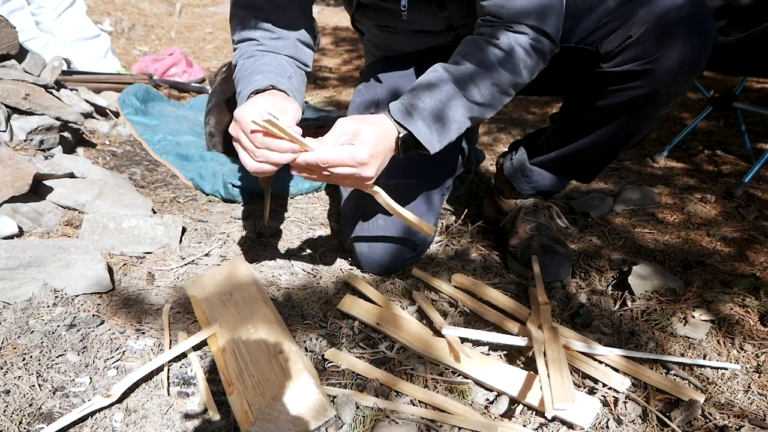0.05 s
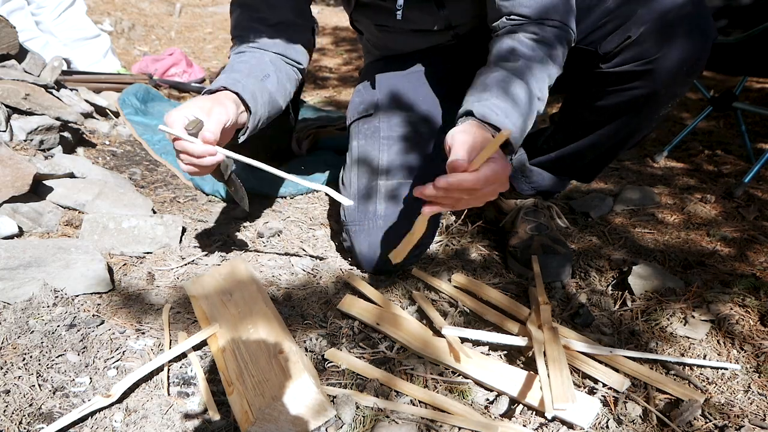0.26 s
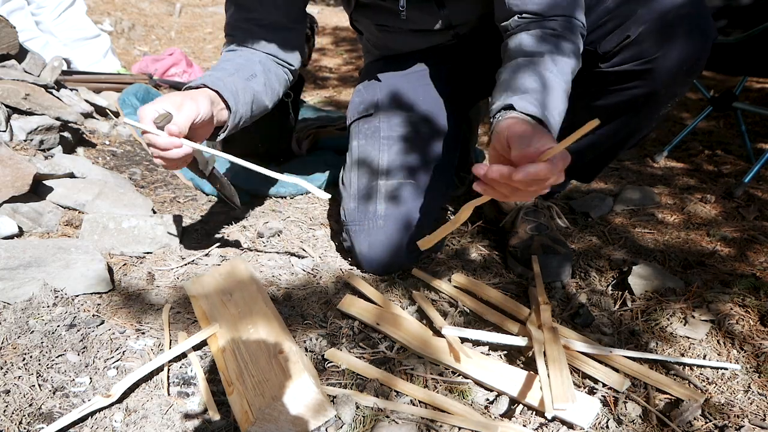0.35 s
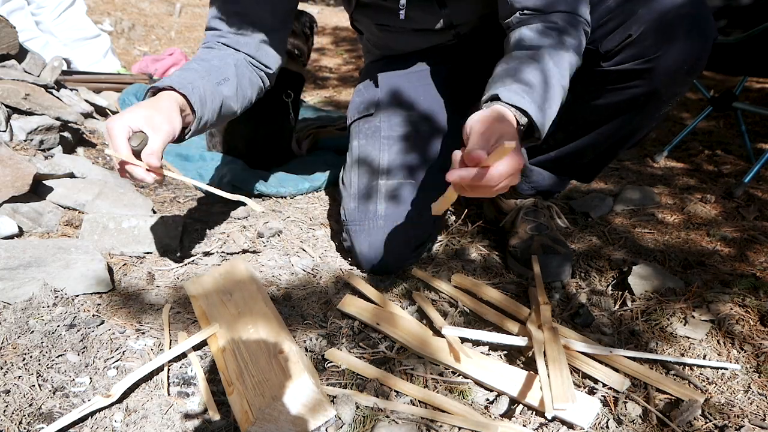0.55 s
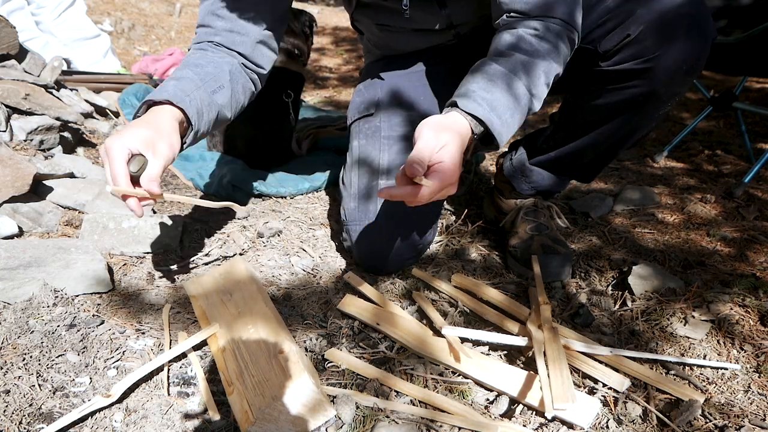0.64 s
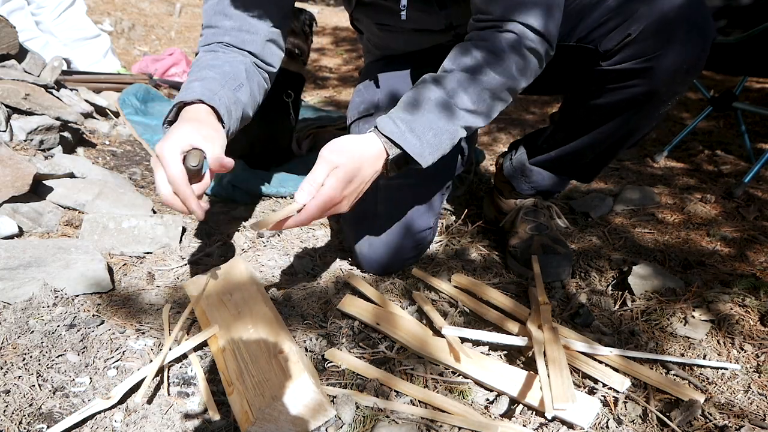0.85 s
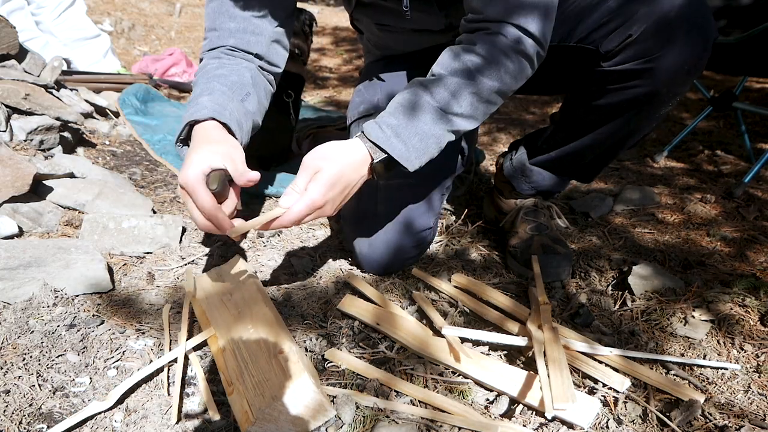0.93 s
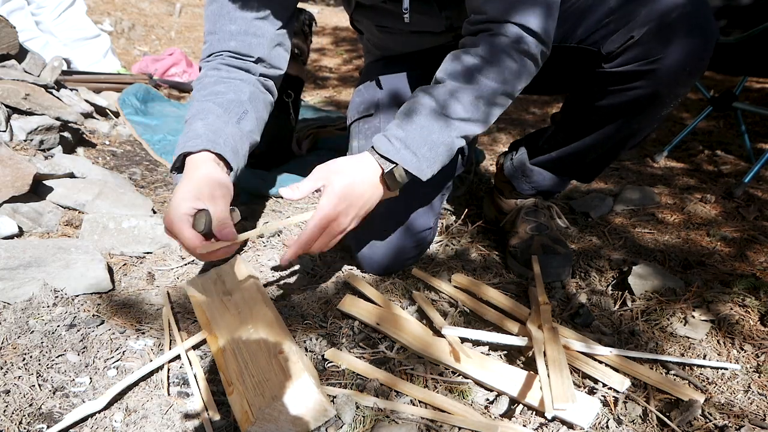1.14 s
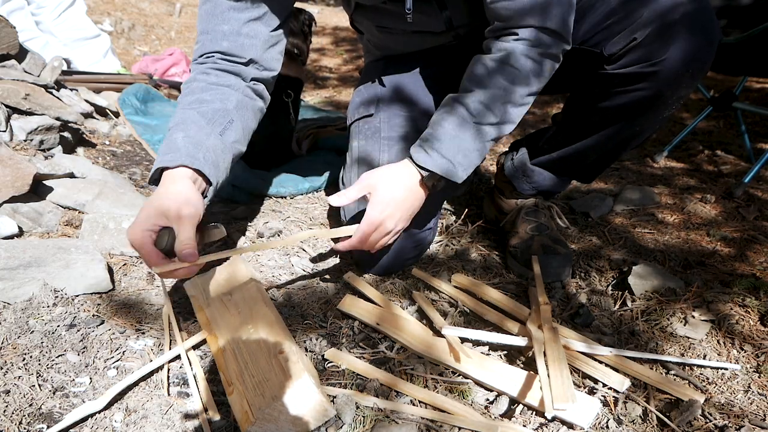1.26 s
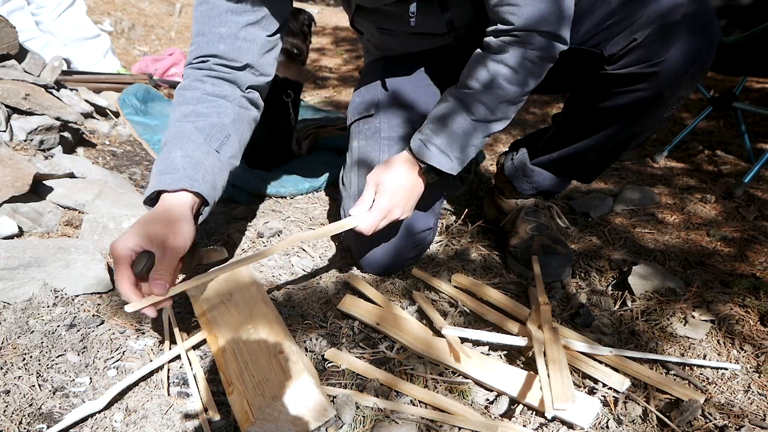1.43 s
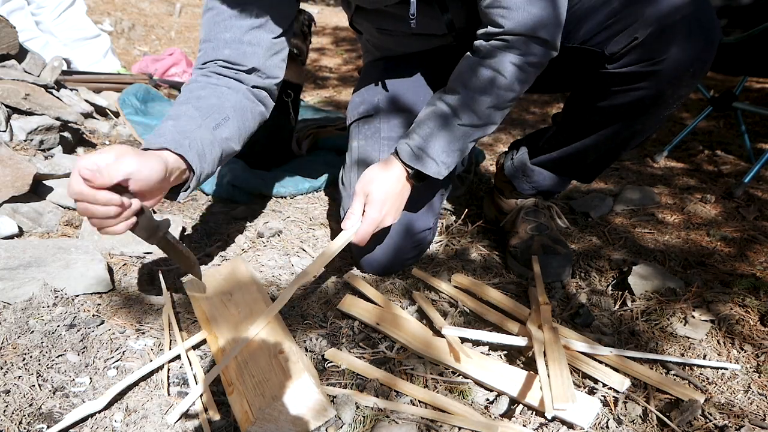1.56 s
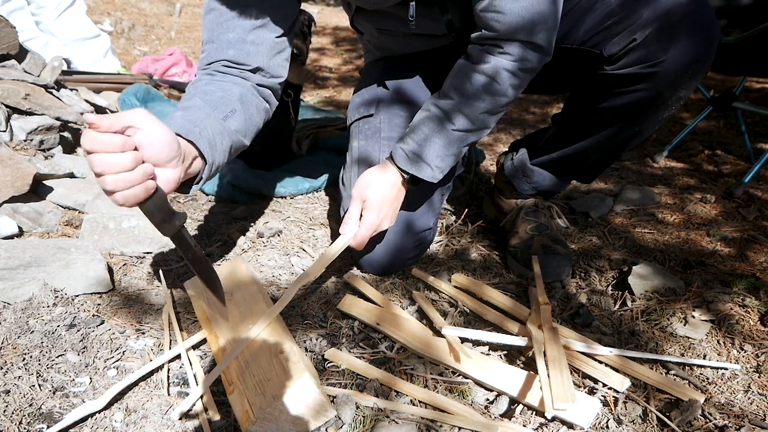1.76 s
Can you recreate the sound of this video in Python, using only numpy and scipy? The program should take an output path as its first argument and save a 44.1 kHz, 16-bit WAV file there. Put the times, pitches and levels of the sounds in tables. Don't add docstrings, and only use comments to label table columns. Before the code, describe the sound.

Wood cracking up close outdoors: fingers rub softly, brittle fibres rip and snap almost at once, light bumps follow, then a dropped stick clacks on other wood and bounces, with faint taps, cloth rustle and low wind.

```python
import sys
import numpy as np
from scipy import signal
from scipy.io import wavfile
from scipy.ndimage import uniform_filter1d

SR = 44100
rng = np.random.default_rng(int(sys.argv[2]) if len(sys.argv) > 2 else 0)


def gain_from_decibels(decibels):
    exponent = np.asarray(decibels, float) / 20
    return 10 ** exponent


def waveform_to_disk(signal):
    frames = np.transpose(np.atleast_2d(signal))
    scaled = np.clip(frames, -1, 1) * 32767
    samples = np.round(scaled).astype(np.int16)
    wavfile.write(sys.argv[1], SR, samples)


N = 79380

# (frequency [Hz], level [dB])
STRIP = [(1100, -22), (2300, -12), (3600, -19), (5500, -1), (8500, -2), (10300, -13), (12800, -6),
         (15700, -17)]


def evened(x):
    return x / np.sqrt(np.mean(x ** 2) + 1e-20)


def peaked(x):
    return x / abs(x).max()


def read(points, hz):
    f, value = np.transpose(points)
    return np.interp(np.log(hz + 1), np.log(f + 1), value)


def level(points):
    return gain_from_decibels(np.interp(np.arange(N) / SR, *np.transpose(points)))


def add(mix, s, sound):
    part = mix[round(s * SR):][:len(sound)]
    part += sound[:len(part)]


def resonate(x, hz, width):
    return signal.lfilter(*signal.iirpeak(min(hz, SR * .45), max(hz / width, .3), SR), x)


def coloured(x, points):
    hz = abs(np.fft.fftfreq(4096, 1 / SR))
    octaves_below = np.maximum(np.log2(points[0][0] / (hz + 1)), 0)
    log_gain = np.log(gain_from_decibels(read(points, hz) - 41 * octaves_below) + 1e-5)
    impulse = np.fft.ifft(np.exp(np.conj(signal.hilbert(log_gain)))).real[:2048]
    return signal.oaconvolve(x, impulse)[:len(x)]


def wash(points, size, patchy_db):
    hz = np.fft.rfftfreq(size, 1 / SR)
    a, b, patches = rng.standard_normal((N * 4 // size + 5, len(hz), 3)).T
    patches = uniform_filter1d(patches, size=12, axis=0)
    patches = evened(uniform_filter1d(patches, size=10, axis=1))
    octaves_above = np.maximum(np.log2((hz + 1) / points[-1][0]), 0)
    octaves_below = np.maximum(np.log2(points[0][0] / (hz + 1)), 0)
    spectrum_db = read(points, hz) - 60 * octaves_above - 12 * octaves_below
    z = (a + 1j * b) * gain_from_decibels(spectrum_db[:, None] + patchy_db * patches)
    return evened(signal.istft(z, nperseg=size, noverlap=size * 3 // 4)[1][:N])


def scattered_grains(chance, spread_db, limit):
    strength = gain_from_decibels(spread_db * np.minimum(rng.exponential(1, N), limit))
    return strength * (rng.random(N) < chance) * rng.choice([-1, 1], N)


def burst(noise, hz, t60, width, snap_t60, fizz_db, share):
    t = np.arange(len(noise)) / SR
    decay = gain_from_decibels(-60 * t / snap_t60) + gain_from_decibels(fizz_db - 60 * t / t60)
    drive = (t == 0) + share * noise * decay
    pitched = resonate(drive, hz, width * hz)
    return drive, resonate(pitched, hz, 2 * width * hz)


def distant_wash():
    # (frequency [Hz], level [dB])
    air = [(150, -3), (260, -6), (600, -1.5), (1300, -3), (2900, -22.5), (8500, -35), (10500, -32),
           (14000, -34)]
    return gain_from_decibels(-49.5) * wash(air, size=1024, patchy_db=0.5)


def wind():
    # (frequency [Hz], level [dB])
    rumble = [(8.8, -24), (15, 10.5), (35, -14.5), (74, -14), (145, -28), (300, -37.5), (390, -55),
              (660, -120)]
    # (time [s], level [dB])
    gust = [
        (0.0, -39),
        (1.748, -43.5),
        (1.8, -57),
    ]
    return level(gust) * wash(rumble, size=4096, patchy_db=4.0)


def sleeve():
    # (time [s], level [dB])
    motion = [(0, -56), (.03, -62), (.06, -62), (.26, -49.5), (.34, -50.5), (.41, -49), (.5, -49),
              (.6, -44), (.69, -49.5), (.73, -53.5), (.86, -50.5), (1.05, -52), (1.25, -54), (1.34, -45.5),
              (1.42, -49.5), (1.6, -51), (1.72, -52.5), (1.8, -63)]
    # (frequency [Hz], level [dB])
    weave = [(600, 4), (1500, 4.5), (3000, -3), (6400, -5.5), (8500, -4.5), (10500, -13.5), (13500, -12.5),
             (15700, -17)]
    rustles_per_s, hiss_share = 2500, 0.65
    grains = scattered_grains(rustles_per_s / SR, spread_db=3, limit=4)
    hiss = wash(weave, size=256, patchy_db=-2.0)
    cloth = hiss_share * hiss + (1 - hiss_share) * evened(coloured(grains, weave))
    return level(motion) * evened(cloth)


def slide():
    # (time [s], level [dB])
    rubbing = [
        (0, -50),
        (.1, -48),
        (.17, -49),
        (.3, -53),
        (.45, -57),
        (.55, -85),
    ]
    # (frequency [Hz], width [Hz], level [dB])
    grip = [(950, 220, -10), (1610, 180, 13), (2132, 170, 14), (2510, 260, 5)]
    roughness = evened(uniform_filter1d(rng.standard_normal(N), size=500))
    rub = rng.standard_normal(N) * gain_from_decibels(1.6 * roughness)
    body = np.zeros(N)
    for hz, width, db in grip:
        body += gain_from_decibels(db) * resonate(resonate(rub, hz, width), hz, 2 * width)
    return level(rubbing) * evened(body)


def tear():
    # (time [s], level [dB])
    ripping = [(.175, -90), (.178, -46), (.202, -46), (.2055, -30), (.243, -31), (.262, -50), (.28, -90)]
    grains = scattered_grains(.12, spread_db=4, limit=3)
    return level(ripping) * evened(coloured(grains, STRIP))


def cracks():
    # (time [s], peak level [dB], centre [Hz], t60 [s])
    snaps = [(.1772, -20, 7000, .022), (.1812, -31, 8000, .012), (.1937, -25, 8000, .02),
             (.2006, -31, 5500, .01), (.2025, -27, 8000, .04), (.2054, 0, 7500, .011),
             (.2059, -7, 5700, .014), (.2070, -10, 8000, .03), (.2114, -8, 7500, .016),
             (.2149, -3, 6500, .009), (.2175, -7, 7800, .014), (.2186, -12, 5300, .035),
             (.2222, -23, 6000, .03), (.2257, -14, 5000, .016), (.2268, -15, 7000, .018),
             (.2309, -12, 5800, .025), (.2322, -15, 5500, .02), (.2346, -15, 6000, .02),
             (.2357, -6, 5200, .014), (.2360, -7, 5000, .012), (.2374, -3, 5500, .01),
             (.2378, -8, 5500, .012), (.2382, -8, 5600, .014), (.2385, -12, 12500, .025),
             (.2403, -14, 6500, .015), (.2412, -10, 5500, .02), (.2456, -18, 5500, .025),
             (.2509, -21, 7000, .018), (.2568, -28, 6000, .014), (.2646, -30, 6000, .008),
             (.2678, -28, 6000, .008), (.3055, -38, 13000, .02), (.3345, -34, 12500, .035),
             (.3365, -33, 13000, .03), (.3395, -38, 12000, .02)]
    snap_noise, plain_t60 = .13, .014
    wide_db = -1
    out, noise = np.zeros(N), rng.standard_normal((len(snaps), 2000))
    for (s, db, hz, t60), row in zip(snaps, noise):
        fray = snap_noise * (t60 / plain_t60) ** 2
        drive, snap = burst(row, hz, t60, width=.36, snap_t60=.003, fizz_db=-4, share=fray)
        sound = peaked(snap) + gain_from_decibels(wide_db) * peaked(coloured(drive, STRIP))
        add(out, s, gain_from_decibels(db) * peaked(sound))
    return out


def knocks():
    # (time [s], peak level [dB], centre [Hz], t60 [s])
    bumps = [(.2374, -13, 1900, 0.01), (.3060, -36, 750, .02), (.3085, -45, 760, 0.017),
             (0.3272, -30, 1160, 0.015), (0.3395, -32, 2300, 0.012), (0.3665, -25, 1300, 0.0035),
             (0.3667, -27, 2100, 0.008), (.3683, -26, 1600, 0.026), (0.3742, -32, 1400, 0.021),
             (.4220, -38, 600, 0.018), (.9637, -33, 1550, 0.009), (0.9945, -28, 1500, 0.0073),
             (1.0458, -30, 900, .012), (1.0885, -29, 1420, .015), (1.3790, -38.5, 726, .02),
             (1.392, -35, 590, 0.039), (1.4541, -26, 4150, 0.0065), (1.4541, -33.5, 1270, 0.013),
             (1.4746, -36, 1150, 0.02), (1.6838, -34, 1000, 0.02), (1.7112, -35, 1500, 0.0098),
             (1.7228, -35, 950, 0.03), (.2114, -30, 950, .015), (.2152, -34, 950, .012),
             (.2318, -23, 1700, .035), (.2405, -21, 1800, .02), (.2462, -28, 2200, .015),
             (.3290, -33, 1100, .012), (.9755, -35, 1600, .012), (1.6845, -37, 450, .03)]
    out, noise = np.zeros(N), rng.standard_normal((len(bumps), 2500))
    for (s, db, hz, t60), row in zip(bumps, noise):
        bump = burst(row, hz, t60, width=.8, snap_t60=.0089, fizz_db=0, share=.06)[1]
        bump = signal.sosfilt(signal.butter(4, 1.6 * hz, fs=SR, output="sos"), bump)
        add(out, s, gain_from_decibels(db) * peaked(bump))
    return out


def taps():
    # (time [s], peak level [dB], brightness [dB per octave], tick [dB], pile [dB])
    contacts = [(.8700, -30, 0, -7, -25), (.9120, -30, 4, 4, -10), (.9141, -18, -5, 2, 0),
                (.9148, -5, 0, -4, 0), (.9164, -11, 5, 0, 2), (.9231, -21, -14, -10, -8),
                (.9295, -26, -3, 3, 3), (.9503, -22, 8, -4, -16), (.9635, -37, -24, -16, -12),
                (.9755, -38, -24, -16, -12), (.9942, -33, -24, -9, -6), (1.0400, -41, 3, 6, -9),
                (1.0520, -42, 2, 4, -9), (1.0890, -41, 0, 6, -9), (1.160, -41, 2, 3, -9),
                (1.1836, -43, 6, 8, -9), (1.530, -44, 6, 8, -9), (1.6836, -29, -30, -8, -25),
                (1.7220, -38, -22, -6, -25), (1.7393, -39, -22, -14, -25), (1.7505, -38, -22, -14, -25)]
    # (frequency [Hz], level [dB], t60 [s])
    stick = [(1930, -6, .042), (2940, -20, .075), (3400, -20, .06), (3790, -19, .07), (4830, -21, .06),
             (5360, -12, .045), (7170, -16, .04), (8900, -17, .03), (11900, -24, .024), (13100, -30, .03)]
    # (frequency [Hz], level [dB], t60 [s])
    pile = [(1105, -19, .07), (1250, -24, .025), (1650, -10, .022), (2300, -11, .03), (2650, -12, .025),
            (3200, -15, .025), (4590, -10, .03), (5450, -16, .018), (5750, -14, .015), (6890, -2, .014),
            (7750, -12, .014), (8200, -15, .014), (13600, -15, .012)]
    # (frequency [Hz], level [dB])
    tick_colour = [(1200, -5), (2600, 0), (4100, -9), (7800, -3), (10300, -15), (13500, -12), (15700, -20)]
    spread_db, tick_t60, contact_s = 1.5, .022, .0002
    out, t = np.zeros(N), np.arange(6000) / SR
    hz, mode_db, t60 = np.concatenate([stick, pile]).T[:, :, None]
    in_pile = (np.arange(len(hz)) >= len(stick))[:, None]
    octaves = abs(np.log2(hz / 1900))
    chance = rng.standard_normal((len(contacts), len(hz), 2))
    noise = rng.standard_normal((len(contacts), len(t)))
    for (s, db, tilt_db, tick_db, pile_db), c, row in zip(contacts, chance, noise):
        blow_db = mode_db + pile_db * in_pile + tilt_db * octaves + spread_db * c[:, :1]
        detuned = hz * (1 + 0.003 * c[:, 1:])
        modes = gain_from_decibels(blow_db - 60 * t / t60) * np.sin(2 * np.pi * detuned * t)
        ring = modes.sum(0) * (1 - np.exp(-t / contact_s))
        tick_tilt = .3 * max(tilt_db, -3)
        tilted = [(f, d + tick_tilt * np.log2(f / 3000)) for f, d in tick_colour]
        tick = coloured(row * gain_from_decibels(-60 * t / tick_t60), tilted)
        sound = peaked(ring) + gain_from_decibels(tick_db) * peaked(tick)
        add(out, s, gain_from_decibels(db) * peaked(sound))
    return out


def ground(x):
    t = np.arange(4000) / SR
    echo_t60, first_s = .03, .0012
    reflections = rng.choice([-1., 1.], len(t)) * (rng.random(len(t)) < .1)
    tail = reflections * gain_from_decibels(-60 * t / echo_t60) * (t > first_s)
    return signal.oaconvolve(x, tail / np.linalg.norm(tail))[:N]


def scene():
    floor = distant_wash() + wind()
    handling = sleeve() + slide()
    hits = tear() + cracks() + knocks() + taps()
    echo_db = -17
    return (hits + gain_from_decibels(echo_db) * ground(hits) + handling + floor)[None]


def top_cut(x):
    return signal.sosfilt(signal.butter(12, 16440, fs=SR, output="sos"), x)


def record(dry):
    edge_hz, leak_db = 15800, -45
    dull = signal.oaconvolve(dry, signal.firwin(301, edge_hz, fs=SR)[None], "same")
    mix = np.clip(dull + gain_from_decibels(leak_db) * dry, -1, 1)
    return top_cut(mix)


dry = scene()
out = record(dry)
waveform_to_disk(out)
```